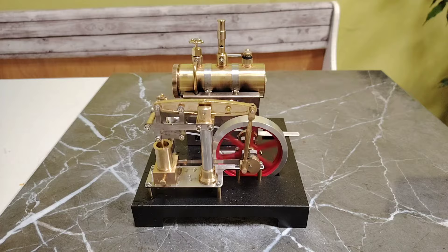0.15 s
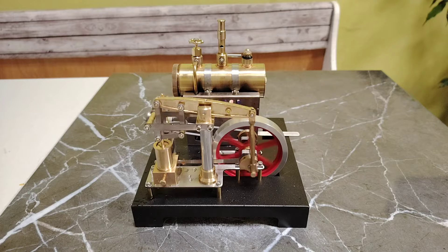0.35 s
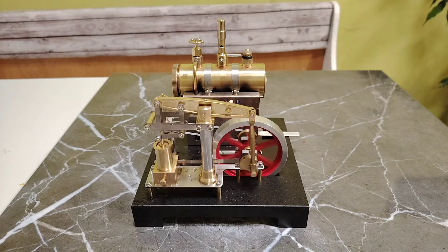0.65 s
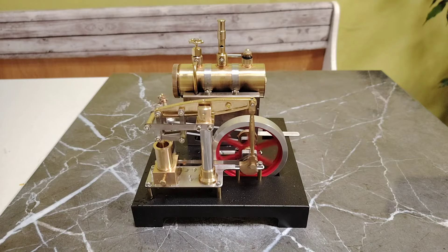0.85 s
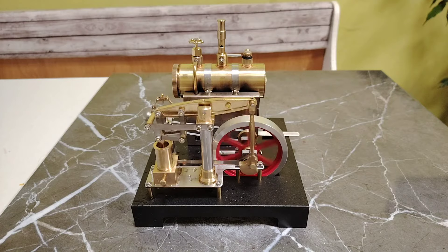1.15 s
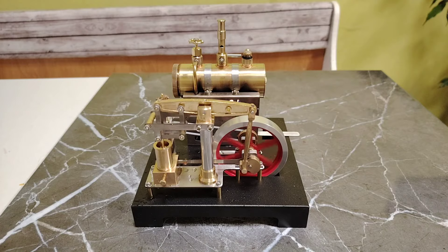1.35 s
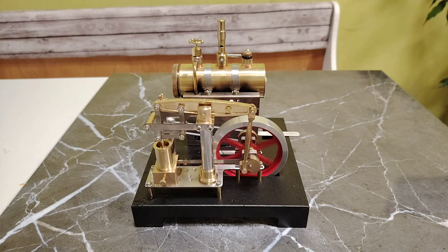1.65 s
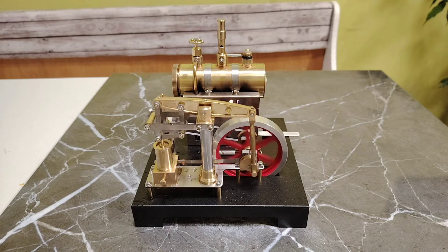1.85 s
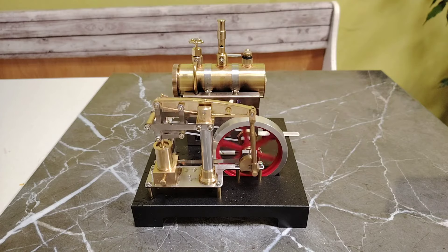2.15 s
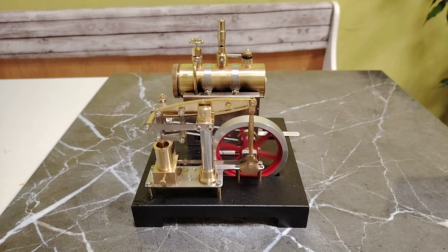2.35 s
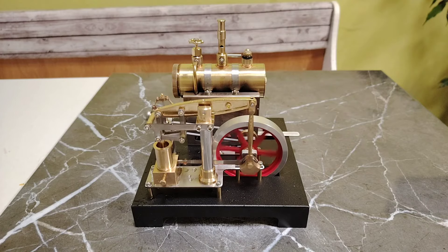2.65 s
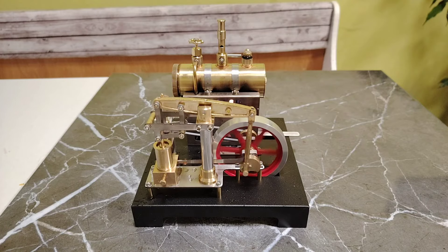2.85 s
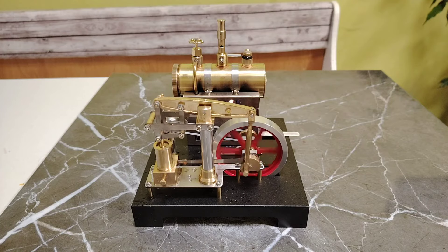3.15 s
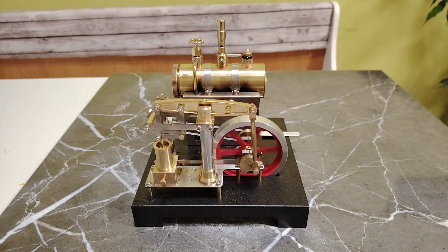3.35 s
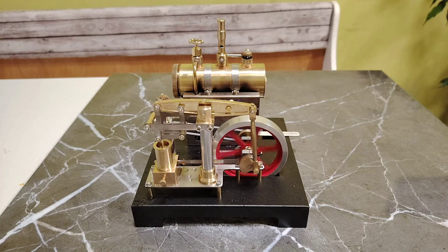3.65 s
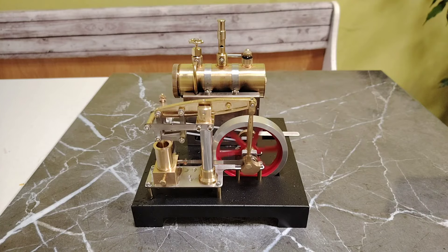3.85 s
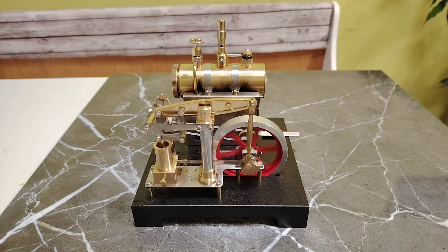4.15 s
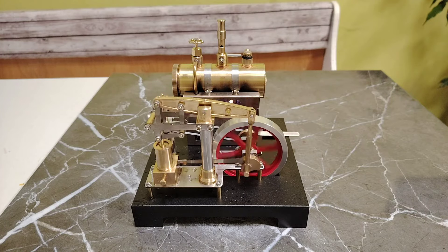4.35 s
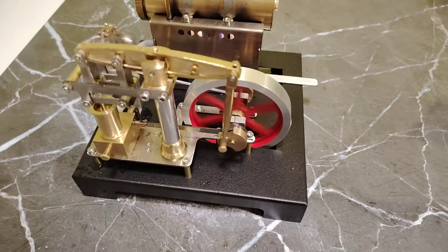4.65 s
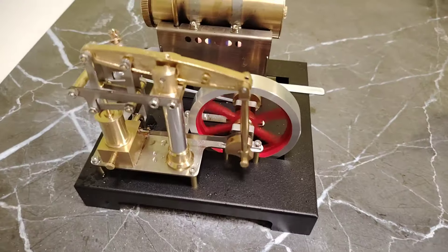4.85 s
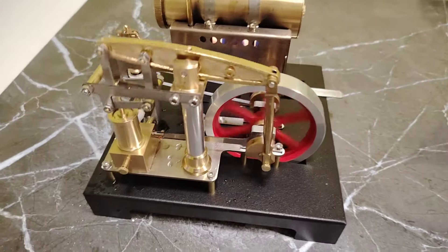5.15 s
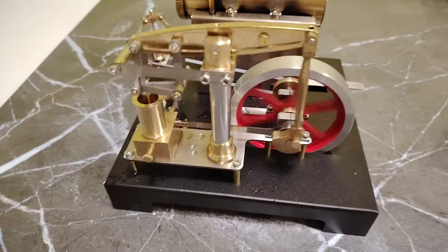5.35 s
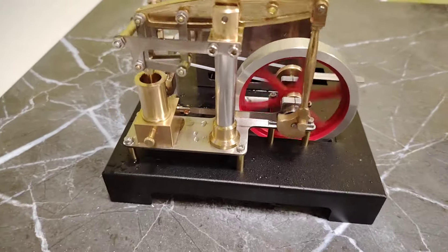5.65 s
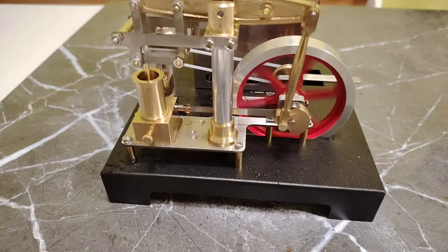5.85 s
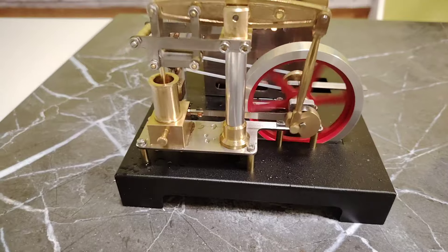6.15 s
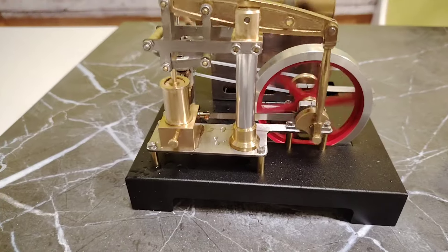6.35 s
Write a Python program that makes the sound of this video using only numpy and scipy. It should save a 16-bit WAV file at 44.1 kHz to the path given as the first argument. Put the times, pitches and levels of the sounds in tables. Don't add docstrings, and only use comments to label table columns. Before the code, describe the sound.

Rapid, even metallic clacks and raspy piston rubs from a tiny steam engine, with faint burner hiss, a short gap, then nearer and louder.

```python
import sys
import numpy as np
from scipy import signal
from scipy.fft import rfft, irfft, next_fast_len
from scipy.io import wavfile
from scipy.ndimage import uniform_filter1d, map_coordinates

SR = 44100
rng = np.random.default_rng(int(sys.argv[2]) if len(sys.argv) > 2 else 0)


def how_loud(loudness_db):
    steps = np.asarray(loudness_db, float) / 20
    return 10 ** steps


def output_pcm(signal):
    pcm = np.clip(np.atleast_2d(signal).T, -1, 1) * 32767
    wavfile.write(sys.argv[1], SR, np.round(pcm).astype(np.int16))


N = 286650
CUT_S = 4.7


def unit(x):
    return x / np.sqrt(np.mean(x ** 2) + 1e-20)


def along(points, hz):
    f, v = np.transpose(points)
    return np.interp(np.log(hz + 1), np.log(f + 1), v)


def filtered(x, response):
    m = next_fast_len(N + SR // 8)
    return irfft(rfft(x, m) * response(np.fft.rfftfreq(m, 1 / SR)), m)[..., :N]


def ringing(modes):
    f = np.linspace(0, SR / 2, num=6000)
    shape = 0
    for k, (c, w, db) in enumerate(modes):
        shape = shape + (-1) ** k * how_loud(db) * 1j * f * w / (c * c - f * f + 1j * f * w)
    return lambda hz: np.interp(hz, f, unit(np.abs(shape)) * np.exp(1j * np.angle(shape)))


def wobble(rate_hz):
    step = np.arange(0, N + 16, 16)
    knots = rng.standard_normal(int(N * rate_hz / SR) + 4)
    return np.interp(np.arange(N), step, map_coordinates(knots, [step * rate_hz / SR]))


def pair(size, apart):
    return rng.standard_normal(size) + apart * rng.standard_normal((2, size))


def grit(spread_db, flutter_db, apart):
    grains_db = spread_db * np.minimum(rng.exponential(size=N), 5.5)
    slip_db = flutter_db * (wobble(170) + 0.43 * wobble(45))
    return unit(pair(N, apart) * how_loud(grains_db + slip_db))


def effort(times, levels_db, rise_s, fall_s, hump_db):
    power, t = np.zeros(N), np.arange(N) / SR
    for s, length, db in zip(*times, levels_db):
        near = slice(max(round((s - .1) * SR), 0), round((s + .3) * SR))
        u = t[near] - s
        edge_db = -20 * (np.clip(-u, 0, None) / rise_s + np.clip(u - length, 0, None) / fall_s)
        arch_db = -hump_db * np.clip(2 * u / length - 1, -1, 1) ** 2
        power[near] += how_loud(db + edge_db + arch_db) ** 2
    return np.sqrt(power)


# [down rub/dB, upper frame rel/dB, up rub/dB, upper frame rel/dB]
PISTON_RUBS = [(-46.5, -4, -48.5, 1.5), (-46, 3, -46.5, 2), (-44.5, -1, -47.5, -1), (-47, -2, -46.5, 3),
               (-45, -1, -47, -1), (-46.5, -8, -47.5, 5.5), (-46, 4, -45.5, -4), (-48, -9, -45, -6),
               (-48, 5, -47.5, 1), (-46, -2, -46.5, -1), (-48.5, -1, -47.5, 6), (-46, -6, -46.5, 3.5),
               (-45.5, 2, -47.5, -1), (-44, 0, -48, 1), (-45.5, -1, -49, 6.5), (-40.5, 0, -44.5, -9),
               (-43, 4, -45.5, -7), (-43.5, 3, -47, -4), (-43.5, -4, -47, -1), (-41, 0, -49, 4),
               (-40.5, -4, -47, 0)]
# [clack t/s, rub/dB, upper frame rel/dB]
UP_ONLY = [
    (-0.112, -48, -0.5),
    (4.711, -51.5, 3),
]


def strokes():
    # [start after clack or tick/s, length/s, steam hiss/dB, exhaust cup/dB]
    down_far, up_far = (-0.05, 0.073, -53.3, -51.7), (0.08, 0.068, -52.3, -50.7)
    down_near, up_near = (0.034, 0.053, -47, -47.5), (-0.135, 0.058, -47.3, -47.5)
    tick_s = np.array([s for s, _ in VALVE_TICKS] + [N / SR + 1])
    turns = [(s, *rubs) for (s, *_), rubs in zip(ROD_CLACKS, PISTON_RUBS)]
    rows = []
    for s, db, rel_db, *_ in turns:
        begin = (tick_s[np.searchsorted(tick_s, s) - 1], *down_near) if s > CUT_S else (s, *down_far)
        rows.append((*begin, db, rel_db, 1))
    for s, *_, db, rel_db in turns + UP_ONLY:
        begin = (tick_s[np.searchsorted(tick_s, s)], *up_near) if s > CUT_S else (s, *up_far)
        rows.append((*begin, db, rel_db, 0))
    s, after, length, *parts_db, rub_db, rel_db, loaded = np.transpose(rows)
    scatter_db = rng.standard_normal((len(s), 2)) * (0.8, 1.2)
    follow_db = np.outer(rub_db + 46, (0.3, 0.2))
    hiss_db, cup_db = parts_db + (follow_db + scatter_db).T
    return s + after, length, rub_db, rub_db + rel_db, hiss_db, cup_db, loaded


# [f/Hz, width/Hz, level/dB]
LOWER_FRAME = [(1608, 100, -5), (1818, 89, 3.5), (2004, 130, -0.5), (2310, 186, -5), (2700, 160, -13)]
UPPER_FRAME = [(2800, 330, -1.5), (3350, 207, 4.5), (3800, 256, 3.5), (4280, 350, -5.5), (4800, 380, -9)]
EXHAUST_CUP = [(768, 273, -10), (1123, 196, -1.5), (1342, 260, -3.5)]
ENGINE_BASE = [(192, 35, -8.5), (300.3, 26.5, -1), (368, 39, 1.5), (534, 133, -6)]
STONE_SLAB = [(212, 58, 0)]
# [f/Hz, density/dB per Hz]
STEAM_HISS = [(1180, -51.5), (2000, -9.5), (2600, -12), (3310, 1), (4150, -5), (9250, -10.5), (12100, -18),
              (15100, -22), (15600, -35.5), (16000, -62)]


def piston():
    *times, rub_db, high_db, hiss_db, cup_db, loaded = strokes()
    shake = grit(2.38, 2.3, 0.22)
    low_force = grit(3.3, 2.15, 0.55) * effort(times, rub_db + 4.0, 0.038, 0.077, 8)
    high_force = grit(3.1, 2.2, 0.61) * effort(times, high_db - 1.3, 0.013, 0.081, 12.7)
    cup_force = grit(2.7, 1.8, 0.5) * effort(times, cup_db + 3.5, 0.02, 0.054, 5.6)
    base_force = shake * effort(times, rub_db - 19.3 + 7 * loaded, 0.083, 0.047, 1.7)
    near = loaded * (times[0] > CUT_S)
    slab_force = shake * effort(times, rub_db - 47 + 31 * near, .03, 0.034, 2.8)
    frame = filtered(low_force, ringing(LOWER_FRAME)) + filtered(high_force, ringing(UPPER_FRAME))
    cup = filtered(cup_force, ringing(EXHAUST_CUP))
    base = filtered(base_force, ringing(ENGINE_BASE)) + filtered(slab_force, ringing(STONE_SLAB))
    jet = unit(filtered(grit(1.35, 2.25, 1.0), lambda hz: how_loud(along(STEAM_HISS, hz))))
    return frame + cup + base + jet * effort(times, hiss_db + 9.5, .016, 0.056, 4.2)


def coloured(events, usual_db, pins_db, frame_db, missed, hz=None):
    rows = []
    for (s, db, *rest), c in zip(events, rng.standard_normal((len(events), 3))):
        ring_hz = rest[0] if rest else hz * (1 + 0.03 * c[0])
        treble_db = pins_db - 5.5 * (s > CUT_S) + 2.5 * c[1]
        mid_db = frame_db - missed * (db - usual_db) + 2.5 * c[2]
        rows.append((s, db, ring_hz, treble_db, mid_db))
    return rows


# [f/Hz, width/Hz, level/dB]
PIN_MODES = [(5340, 350, 5), (7520, 610, 0), (10120, 950, -7)]
BEAM_MODES = [(3400, 180, -2), (3610, 32, -4.5), (3877, 48, -4)]


def contacts(events, bounces, ring_s, rattle_s, gain_db, beam_db, base_db):
    own, force = np.zeros((2, N + SR)), np.zeros((3, 2, N + SR))
    t = np.arange(SR // 25) / SR
    delay, size_db = np.transpose(bounces)
    chances = rng.standard_normal((len(events), 3, len(delay)))
    for (s, db, hz, treble_db, mid_db), chance in zip(events, chances):
        u = t - (delay * (1 + 0.13 * chance[0]))[:, None]
        size = how_loud(size_db + 1.74 * chance[1])[:, None] * (u > 0)
        tone = np.sin(2 * np.pi * hz * (1 + 0.035 * chance[2][:, None]) * u)
        tone = tone * how_loud(-60 * np.abs(u) / ring_s) * np.clip(u / 0.00029, 0, 1)
        chime = np.sum(size * tone, axis=0)
        shape = np.sum(size * how_loud(-60 * np.abs(u) / rattle_s), axis=0)
        burst = 1.24 * unit(shape * pair(len(t), 0.74)) * np.sqrt(np.mean(shape ** 2))
        own[:, round(s * SR):][:, :len(t)] += how_loud(db + gain_db) * chime / np.abs(chime).max()
        parts = how_loud(db + np.array([0, treble_db, mid_db]))[:, None, None]
        force[..., round(s * SR):][..., :len(t)] += parts * burst
    high, treble, mid = force[..., :N]

    def struck(hz):
        beam_base = how_loud(beam_db) * ringing(BEAM_MODES)(hz) + how_loud(base_db) * ringing(ENGINE_BASE)(hz)
        return how_loud(1.04) * ringing(UPPER_FRAME)(hz) + beam_base

    def pins(hz):
        click = 1j * hz / (3500 + 1j * hz) / (1 + 1j * hz / 7000)
        return how_loud(4) * ringing(PIN_MODES)(hz) + how_loud(1) * click

    lower = how_loud(1.5) * filtered(mid, ringing(LOWER_FRAME + EXHAUST_CUP))
    return own[:, :N] + filtered(high, struck) + filtered(treble, pins) + lower


# [t/s, peak/dB, ring f/Hz]
ROD_CLACKS = [(0.194, -26, 3740), (0.4978, -27, 4160), (0.7976, -28.5, 3557), (1.1014, -25.5, 3580),
              (1.4017, -27.5, 3560), (1.702, -26, 2550), (2.0068, -29, 3860), (2.3077, -29.5, 2800),
              (2.6194, -29.5, 3850), (2.9257, -24.5, 3810), (3.2281, -26.5, 3780), (3.5319, -29, 3200),
              (3.8332, -28.5, 3610), (4.1375, -27.5, 3250), (4.4383, -28, 2620), (5.0064, -30, 3470),
              (5.3023, -28, 3900), (5.5977, -24.5, 3770), (5.9005, -19.5, 3450), (6.1913, -25.5, 3960),
              (6.4914, -26, 3740)]


def rod_clacks():
    rows = coloured(ROD_CLACKS, usual_db=-27, pins_db=-14.8, frame_db=-15, missed=0.4)
    bounces = [(0, 0.8), (.0018, 0.2), (.0055, -7), (.011, -16)]
    return contacts(rows, bounces, ring_s=0.017, rattle_s=0.013, gain_db=0.6, beam_db=-11, base_db=-25)


# [t/s, peak/dB]
VALVE_TICKS = [(0.1155, -36.5), (0.4192, -36.5), (0.7204, -38.5), (1.0198, -35.5), (1.3214, -30),
               (1.6194, -41.5), (1.943, -36), (2.2428, -40.5), (2.5498, -40.5), (2.8596, -37),
               (3.1635, -39.5), (3.466, -36.5), (3.7678, -39.5), (4.0851, -32), (4.3725, -41),
               (4.6788, -58), (4.9278, -30), (5.23, -28), (5.5212, -28.5), (5.8174, -31.5), (6.1113, -32),
               (6.4173, -33)]
# [t/s, peak/dB]
PIN_KNOCKS = [(1.077, -33), (1.1998, -39), (1.3613, -37), (2.4044, -41.5), (2.588, -42.5), (2.7162, -38),
              (2.8976, -34), (3.497, -34), (4.9906, -34), (5.2666, -33.5), (5.6988, -35), (5.8598, -35),
              (6.0033, -38.5), (6.152, -33), (6.4506, -32), (6.4757, -30.5)]


def valve_and_pins():
    ticks = coloured(VALVE_TICKS, usual_db=-36, pins_db=-16, frame_db=-3.5, missed=0.7, hz=3330)
    knocks = coloured(PIN_KNOCKS, usual_db=-35, pins_db=-13, frame_db=-3, missed=0.7, hz=3400)
    bounces = [(0, -0.5), (.0045, -8)]
    return contacts(ticks + knocks, bounces, ring_s=.02, rattle_s=0.0089, gain_db=0.3,
                    beam_db=-16, base_db=-13.5)


# [t/s, f/Hz, level/dB]
BEAM_SONGS = [(0.195, 3810, -47), (0.498, 3500, -53), (0.798, 3830, -51), (1.102, 3530.0, -48),
              (1.402, 3770, -48), (1.703, 3800.0, -51), (2.007, 3800, -50.5), (2.308, 3760, -55),
              (2.62, 3780, -48), (2.925, 3800.0, -48), (3.229, 3800, -48.5), (3.533, 3800, -57),
              (3.834, 3610.0, -55), (4.138, 3590, -52.5), (4.439, 3520, -52), (5.007, 3540.0, -56.5),
              (5.303, 3820.0, -56.5), (5.598, 3790, -53), (5.901, 3540.0, -51.5), (6.192, 3890.0, -51)]


def singing():
    out, t = np.zeros(N + SR), np.arange(SR // 6) / SR
    rough_hz, broken_db = np.pad([75 * wobble(300), 3.5 * wobble(45)], ((0, 0), (0, SR)))
    swell = np.clip(t / .006, 0, 1) * how_loud(-60 * t - 20 * np.clip(t - .08, 0, 1) / .04)
    for s, hz, db in BEAM_SONGS:
        now = slice(round(s * SR), round(s * SR) + len(t))
        drift = np.cumsum(rough_hz[now] + 25 - 600 * t) / SR
        voice = how_loud(broken_db[now]) * np.sin(2 * np.pi * (hz * t + drift))
        for other_hz, rel_db in zip((3540, 3800, 4060), (-7, -8, -2.5)):
            fading = how_loud(rel_db + rng.normal(0, 2) - 110 * t)
            voice = voice + fading * np.sin(2 * np.pi * (other_hz * t - drift + rng.random()))
        out[now] += how_loud(db + 5.8) * swell * voice
    return out[:N] * how_loud(1.7 * wobble(130))


# [t/s, peak/dB]
DROP_SPITS = [(0.2314, -51.5), (0.4625, -36), (0.8867, -19), (1.493, -34), (2.1037, -35), (3.3256, -30.5),
              (4.8014, -43), (4.9717, -32.5), (5.1003, -31), (5.2714, -35), (5.3983, -31), (6.2872, -28.5)]


def spits():
    out, t = np.zeros(N + SR), np.arange(SR // 50) / SR
    for s, db in DROP_SPITS:
        spray = how_loud(-60 * t / 0.005) * rng.standard_normal(len(t))
        out[round(s * SR):][:len(t)] += how_loud(db + 8.5) * (spray + 4 * (t == 0))

    def crack(hz):
        low_cut = 1j * hz / (2500 + 1j * hz)
        return low_cut / (1 + 1j * hz / 6500 - (hz / 8500) ** 2) / (1 + 1j * hz / 11000)

    return filtered(out[:N], crack)


# [t/s, peak/dB]
CUP_TAPS = [
    (5.558, -41),
    (5.852, -34),
    (5.862, -31),
    (5.938, -40),
    (5.969, -37),
    (5.988, -32),
    (6.144, -37),
]


def taps():
    blows = np.zeros(N)
    for s, db in CUP_TAPS:
        blows[round(s * SR):][:20] = how_loud(db + 6) * np.hanning(20)
    body = lambda hz: ringing(EXHAUST_CUP)(hz) + how_loud(-14) * ringing(ENGINE_BASE)(hz)
    return how_loud(-6) * filtered(blows, body)


def whistle():
    t = np.arange(N) / SR
    hz = np.interp(t, [4.51, 4.59], [8300, 10000]) + 160 * wobble(500)
    return how_loud(-51) * np.exp(-((t - 4.55) / 0.042) ** 2) * np.sin(2 * np.pi * np.cumsum(hz) / SR)


def handling():
    t = np.clip(np.arange(N) / SR - 4.866, 0, None)
    turns = 35 * t + 0.83 * (1 - np.exp(-t / .009))
    return how_loud(-46.5) * np.clip(t / .002, 0, 1) * how_loud(-60 * t / 0.074) * np.sin(2 * np.pi * turns)


# [f/Hz, t60/s]
ROOM_T60 = [(200, 0.41), (1500, 0.18), (4000, 0.15), (12000, 0.3)]


def room(x):
    hz, t, z = signal.stft(rng.standard_normal((2, SR // 3)), SR, nperseg=256)
    tail = signal.istft(z * how_loud(-60 * t / along(ROOM_T60, hz)[:, None]), SR, nperseg=256)[1]
    late = np.pad(x, ((0, 0), (130, 0)))
    return signal.fftconvolve(late, tail / np.linalg.norm(tail[0]), axes=1)[:, :N]


# [f/Hz, density/dB per Hz]
QUIET_NOISE = [(24, -65), (40, -38), (237, -28), (382, -11), (455, -13.5), (1180, -8), (1550, -9),
               (1810, -6), (2570, -4.5), (3300, -9), (4570, -10.5), (8550, -22), (14800, -43), (16000, -55)]


def quiet():
    hum = how_loud(-23.5) * filtered(pair(N, .45), ringing([(139, 35, 0)]))
    noise = unit(filtered(pair(N, 0.58), lambda hz: how_loud(along(QUIET_NOISE, hz))))
    return how_loud(-56.5 + 1.5 * wobble(5)) * (noise + hum)


# [f/Hz, left minus right/dB]
PORT_LEVELS = [(60, 9.5), (250, 0), (1000, 3), (2000, 2), (4500, 5), (8000, 0), (12000, -1.7)]
# [f/Hz, phase/rad]
PORT_LEAD = [(300, .1), (1800, 0.95), (4400, 2.74), (6400, 4.56), (9400, 6.7), (15000, 11.5)]


def ports(hz):
    side = np.array([[.5], [-.5]])
    lead = np.exp(1j * side * np.interp(hz, *np.transpose(PORT_LEAD)))
    return how_loud(side * along(PORT_LEVELS, hz)) * lead * (1j * hz / (130 + 1j * hz)) ** 2


def scene():
    engine = piston() + rod_clacks() + valve_and_pins() + singing() + spits() + taps() + whistle()
    return filtered(engine + how_loud(-6) * room(engine), ports) + quiet() + handling()


# [f/Hz, level re usual band level/dB]
SPARED_LINES = [(3000, -20), (8000, -11), (10500, 1), (15000, 1.5)]


def thinned(x):
    hz, t, z = signal.stft(x, SR, nperseg=2048)
    power = np.abs(z) ** 2 + 1e-20
    level_db = 10 * np.log10(uniform_filter1d(power.mean(axis=0), size=16, axis=0)[::16])
    usual_db = .45 * level_db + .55 * uniform_filter1d(level_db, size=14, axis=1)
    chance = unit(uniform_filter1d(rng.standard_normal(level_db.shape), size=3, axis=1))
    band_hz = hz[::16]
    held_db = np.outer(band_hz > 8000, np.interp(t, *np.transpose(TREBLE_REOPEN)))
    bar_db = usual_db + along(SPARED_LINES, band_hz)[:, None] + 6.6 * chance - 0.22 * held_db
    kept = np.clip((10 * np.log10(power) - bar_db[np.arange(len(hz)) // 16]) / 2, .02, 1)
    return signal.istft(z * np.where(hz[:, None] > 2500, kept, 1), SR, nperseg=2048)[1][:, :N]


def band_limit(x):
    return signal.sosfilt(signal.butter(12, 16510, fs=SR, output="sos"), x)


# [t/s, gain/dB]
CUT_FADE = [
    (4.55, -1.2),
    (4.66, -2.5),
    (4.693, -10.5),
    (4.7, -56.5),
    (4.732, -35),
    (4.737, -12),
    (4.8, -3),
    (4.97, -0.5),
]
# [t/s, gain/dB]
TREBLE_REOPEN = [
    (4.693, 0),
    (4.7, -40),
    (4.94, -40),
    (4.97, -18),
    (5.3, -11),
    (5.8, -2),
    (6.5, 1.5),
]


def record(dry):
    t = np.arange(N) / SR
    dry = filtered(thinned(dry), lambda hz: np.clip((15750 - hz) / 500, .001, 1))
    treble = filtered(dry, lambda hz: np.clip((hz - 7550) / 400, 0, 1))
    heard = dry - treble * (1 - how_loud(np.interp(t, *np.transpose(TREBLE_REOPEN))))
    return band_limit(heard * how_loud(np.interp(t, *np.transpose(CUT_FADE))))


dry = scene()
out = record(dry)
output_pcm(out)
```